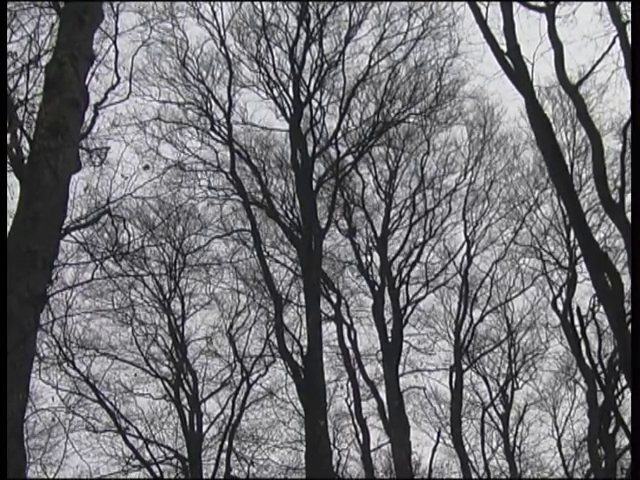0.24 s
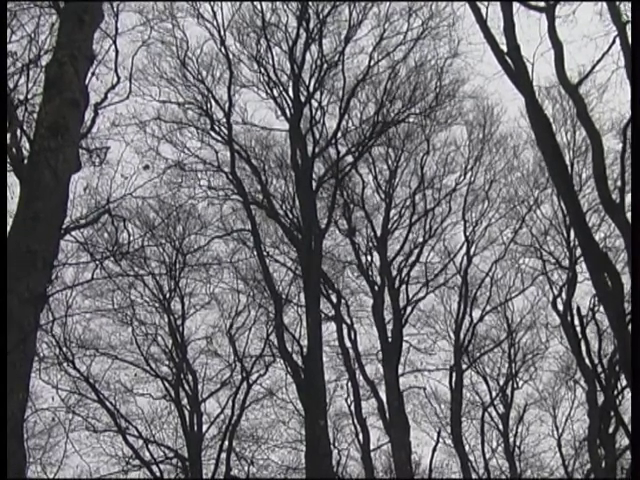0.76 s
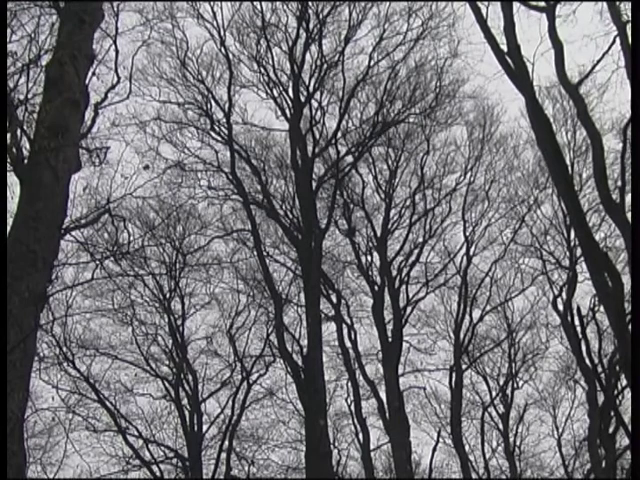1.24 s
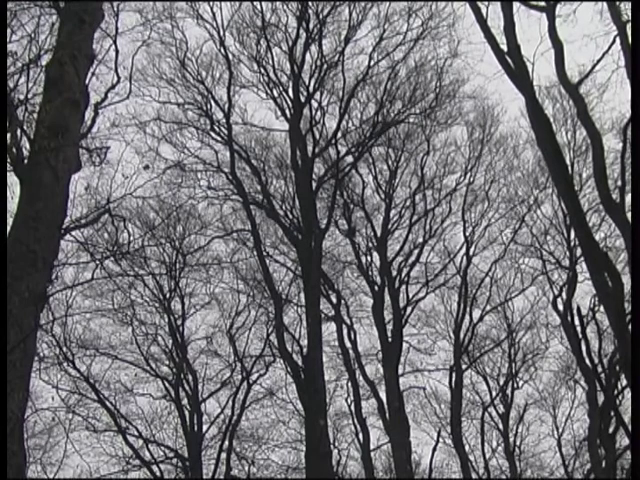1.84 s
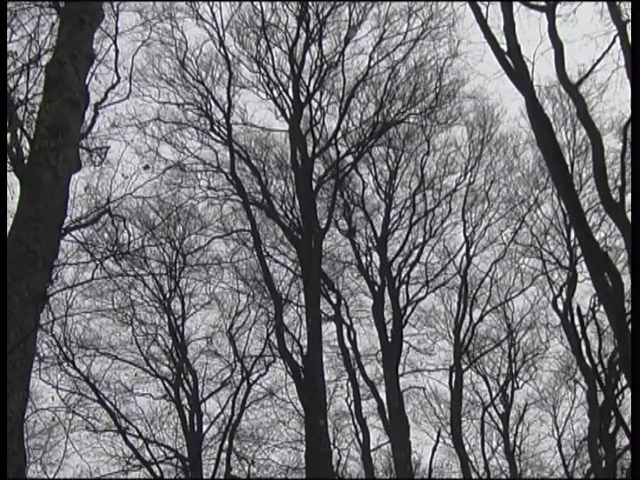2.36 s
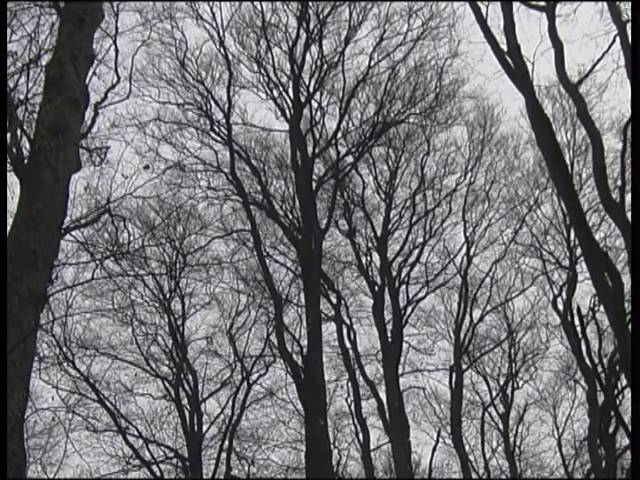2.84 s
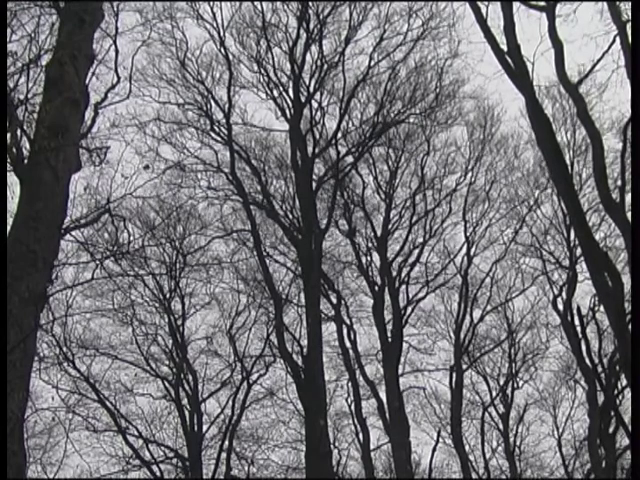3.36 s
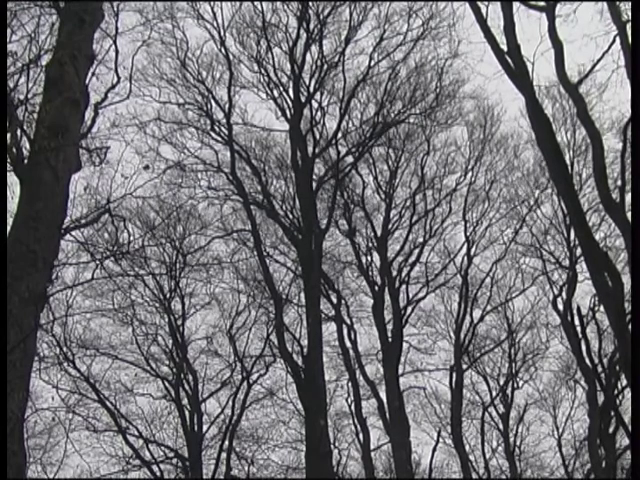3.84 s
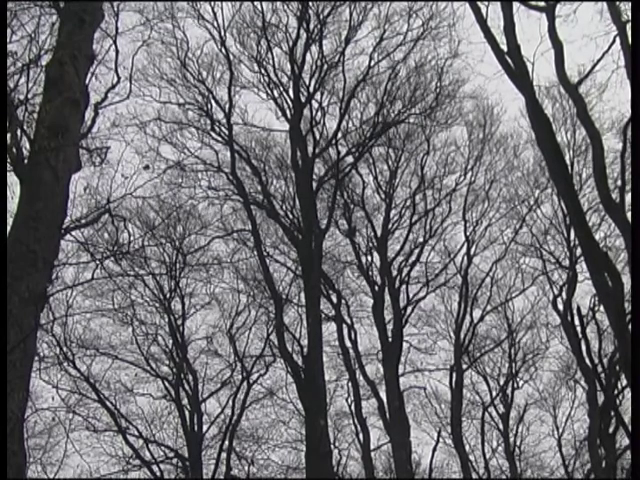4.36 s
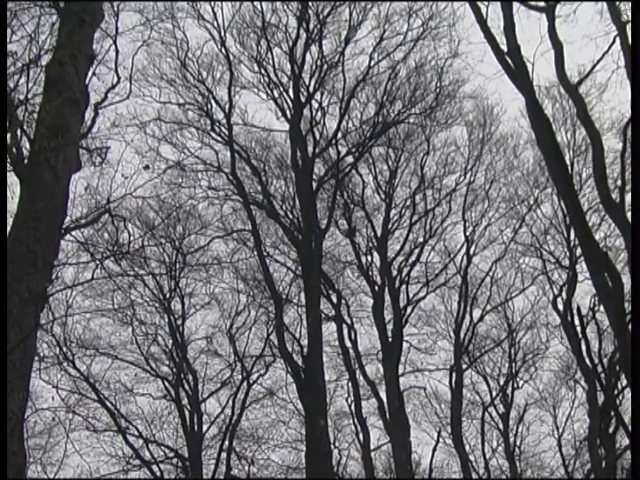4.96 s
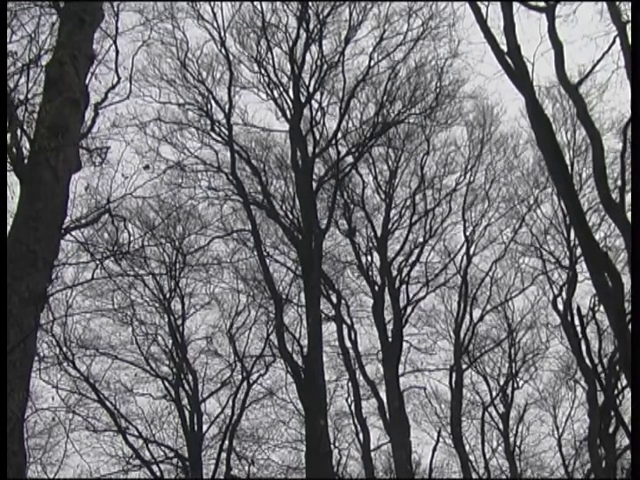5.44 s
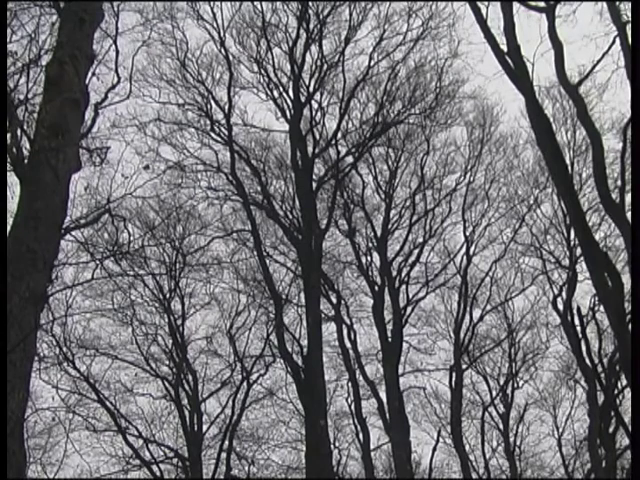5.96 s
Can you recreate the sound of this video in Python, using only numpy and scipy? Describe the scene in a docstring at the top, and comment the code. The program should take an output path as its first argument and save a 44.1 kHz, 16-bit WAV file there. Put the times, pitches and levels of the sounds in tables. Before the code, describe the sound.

In a bare winter wood, a woodpecker drums a dry roll, a chaffinch sings over it, then a louder, hollow roll rings out.

```python
"""The still air of a bare winter wood, a camera's faint hum and thin pulsing high tones, and small birds far off.
A woodpecker drums a dry roll on a dead branch; later a louder roll rings from a hollow trunk.
A chaffinch starts its one full song (trills, a rattle, a flourish) during the first roll and ends before the second.
Struck wood is a set of decaying modes, birds are gliding tones, and air and hiss are shaped noise.
The trunks scatter the drumming, the song and the far calls as echoes and a noisy decaying tail."""
import sys
import numpy as np
from scipy import signal
from scipy.fft import rfft, irfft, next_fast_len
from scipy.io import wavfile
from scipy.ndimage import uniform_filter1d, map_coordinates

SR = 44100
rng = np.random.default_rng(int(sys.argv[2]) if len(sys.argv) > 2 else 0)


def put_to_file(sound):
    """Save the sound as 16-bit audio at rate SR, in the file named by the first command-line argument."""
    columns = np.atleast_2d(sound).T  # one column per channel
    safe = np.clip(columns, -1, 1)
    whole_steps = np.round(safe * 32767)
    wavfile.write(sys.argv[1], SR, whole_steps.astype(np.int16))


N = 273861


def amp(db):
    """Decibels to gain."""
    return 10 ** (np.asarray(db) / 20)


def unit(x):
    """x at rms 1."""
    return x / np.sqrt(np.mean(x ** 2) + 1e-20)


def along(points, hz):
    """Value at hz between (frequency [Hz], value) points on a log axis."""
    f, v = np.transpose(points)
    return np.interp(np.log(hz + 1), np.log(f + 1), v)


def wobble(rate):
    """A smooth random curve with `rate` random knots a second."""
    knots = rng.standard_normal(int(N * rate / SR) + 4)
    return map_coordinates(knots, [np.arange(N) * rate / SR])


def filtered(x, response):
    """x shaped by a gain that depends on frequency."""
    m = next_fast_len(N + SR // 2)
    gain = response(np.fft.rfftfreq(m, 1 / SR))
    return irfft(rfft(x, m) * gain, m)[..., :N]


def noise(spectrum):
    """Coloured noise of rms 1; only the shape of the spectrum counts."""
    white = rng.standard_normal(N)
    return unit(filtered(white, lambda hz: amp(along(spectrum, hz))))


def add(track, s, sound):
    """Mix a sound into the track at time s."""
    part = track[max(round(s * SR), 0):][:len(sound)]
    part += sound[:len(part)]


def forest(x, scatter, echoes, echo_hz, near_t60, far_t60, far_db):
    """Direct sound, echoes of single trunks, quick scatter from near trees and a long tail from far ones."""
    t = np.arange(2 * SR) / SR
    near = amp(-60 * t / near_t60)
    far = amp(far_db - 60 * t / far_t60)
    onset = 1 - np.exp(-t / 0.0011)
    tail = (near + far) * onset * rng.standard_normal(len(t))
    wet = signal.fftconvolve(x, tail / np.linalg.norm(tail))[:N]
    heard = x + filtered(wet, lambda hz: amp(along(scatter, hz)))
    # rough bark mirrors only the longer waves
    dull = filtered(x, lambda hz: 1 / (1 + (hz / echo_hz) ** 2))
    for delay, db in echoes:
        add(heard, delay, amp(db) * dull)
    return heard


def air():
    """The steady hush of the wood, with soft puffs of breeze on the microphone."""
    # spectrum of still air and hiss: (frequency [Hz], relative density [dB])
    hush_spectrum = [(15, -43), (25, -7), (59, -2.5), (107, -7), (154, -3), (195, -4.5), (303, -6),
                     (836, -12), (1270, -19.5), (1520, -17.5), (1730, -21.5), (3590, -18), (5730, -26),
                     (8460, -32.5), (12500, -32), (16200, -68), (22000, -120)]
    # breeze on the microphone: (time [s], level [dB], half length [s])
    breeze = [(0.41, -66, .08), (2.195, -56.5, 0.075), (2.766, -57.5, 0.075), (3.424, -52, 0.063),
              (4.36, -57.5, 0.15)]
    # spectrum of the breeze: (frequency [Hz], relative density [dB])
    breeze_spectrum = [(20, -12), (60, -12), (110, -8), (250, -42), (800, -63)]
    t = np.arange(N) / SR
    puffs = sum(amp(db) * np.exp(-((t - s) / length) ** 2) for s, db, length in breeze)
    hush_level = amp(-57 + wobble(2.85))
    return hush_level * noise(hush_spectrum) + puffs * noise(breeze_spectrum)


def camera():
    """A slightly unsteady hum, thin high tones that pulse 25 times a second, a thin fizz and each channel's hiss."""
    # hum and high tones: (frequency [Hz], rms level before the pulsing [dB], depth of the pulsing [0-1])
    hum_and_high_tones = [(150.1, -64, 0), (13273, -81, .9), (13573, -83, .9), (15622, -75, .3)]
    t = np.arange(N) / SR
    drift = 0.31 * wobble(6.6)  # phase, radians
    pulse = np.cos(2 * np.pi * 25 * t)  # 25 Hz
    tones = np.zeros(N)
    for hz, db, depth in hum_and_high_tones:
        level = np.sqrt(2) * amp(db + .3 * wobble(9.1))
        tones += level * (1 + depth * pulse) * np.sin(2 * np.pi * hz * t + drift)
    fizz = noise([(12000, -30), (13200, -17.5), (15250, -16), (15600, 0), (15750, -7), (15900, -62.5)])
    hiss_spectrum = [(3000, -61), (7000, -4.5), (10000, -1.0), (15000, -7.0)]
    hiss = np.array([noise(hiss_spectrum) for channel in range(2)])
    return tones + amp(-76) * fizz + amp(-77.0) * hiss


def syllables():
    """The bird syllables by name, each a (shape, depth of the raspy flutter [0-1]) pair."""
    # chaffinch shapes: (time from the start [s], frequency [Hz], relative level [dB])
    slur = [(0, 5744, -13), (.008, 4904, -7.5), (.019, 3980, -2.5), (.027, 2715, -16), (.030, 3700, -2),
            (.037, 4785, -8)]
    dip = [(0, 3680, -11), (.005, 4547, -13), (.009, 3690, -6.5), (.012, 4200, -7), (.016, 3234, -0.5),
           (.026, 2675, -4), (.032, 2150, -13.5), (.037, 3000, -5), (.047, 3282, -3), (.053, 3190, -9)]
    stroke = [(0, 4120, -10.5), (.004, 3723, -5.5), (.008, 3200, -2), (.012, 2740, -25)]
    zip_note = [(0, 3530, -5.5), (.009, 7130, -10), (.014, 4955, -3.5), (.020, 6774, -11.5),
                (.026, 4870, 2.5), (.029, 6140, -2.5), (.036, 3890, -4), (.043, 5220, 0)]
    rasp_note = [(0, 5400, -11), (.005, 3930, -3.5), (.007, 5050, -1), (.012, 2800, 5), (.014, 3930, -2.5),
                 (.020, 2200, -1), (.022, 2850, -4.5), (.030, 1845, -6.5)]
    tick = [(0, 7480, 4.5), (.004, 4980, -3.5), (.010, 3600, -12.5), (.016, 4360, 8)]
    whistle = [(0, 1890, -13), (.025, 2007, -14), (.040, 2478, -4.5), (.053, 3110, 0), (.062, 2500, -9.5),
               (.073, 1340, -19)]
    # far birds' shapes: (time from the start [s], frequency [Hz], relative level [dB])
    high_note = [(0, 5950, -14), (.03, 6010, -3.5), (.07, 6100, -4)]
    low_note = [(0, 4350, -2.5), (.035, 4330, -0.5), (.062, 4340, -4)]
    sigh = [(0, 3750, -9.5), (.03, 3316, 2.5), (.05, 2870, -9)]
    far_cry = [(0, 1148, -4), (.05, 1312, -1.5), (.11, 1300, -4), (.16, 1092, -3)]
    pip = [(0, 3200, -9), (.006, 3080, 2.5), (.014, 2950, -12.5)]
    buzz = [(0, 3360, -3.5), (.02, 3350, 1), (.04, 3300, -6)]
    flute = [(0, 2250, -5), (.1, 2250, -3.5), (.17, 2230, -4.5)]
    return {"slur": (slur, 0.01), "dip": (dip, .011), "stroke": (stroke, .0062),
            "zip": (zip_note, 0.0695), "rasp": (rasp_note, 0.037), "tick": (tick, .05),
            "whistle": (whistle, 0.0072), "high": (high_note, .002), "low": (low_note, .0019),
            "sigh": (sigh, .02), "cry": (far_cry, .062), "pip": (pip, .01),
            "buzz": (buzz, .055), "flute": (flute, 0.0044)}


def sing(notes):
    """A tone glides through each syllable's shape; a fast flutter of its pitch makes it raspy."""
    track, flutter = np.zeros(N), wobble(700)
    shapes = syllables()
    for s, syllable, level, ratio in notes:
        shape, rasp = shapes[syllable]
        knots, hz, db = np.transpose(shape)
        t = np.arange(int(knots[-1] * SR)) / SR
        swell = amp(np.interp(t, knots, db)) * signal.windows.tukey(len(t), .12)
        glide = uniform_filter1d(np.interp(t, knots, hz), size=60)
        local_flutter = flutter.take(round(s * SR) + np.arange(len(t)), mode="clip")
        pitch = ratio * glide * (1 + rasp * local_flutter)
        phase = 2 * np.pi * np.cumsum(pitch) / SR
        add(track, s, amp(level) * swell * np.sin(phase))
    return track


def beats(pace):
    """Times of a repeated syllable whose gap changes steadily."""
    gaps = pace["gap"] + pace["slowing"] * np.arange(pace["count"] - 1)
    return pace["start"] + np.append(0, np.cumsum(gaps))


def trill(syllable, pace, course):
    """One syllable repeated while its level and pitch follow the course."""
    s, db, ratio = np.transpose(course)
    return [(at, syllable, np.interp(at, s, db), np.interp(at, s, ratio)) for at in beats(pace)]


def twitter(s, db, count):
    """A short buzz, then pips that step down in pitch."""
    wait_s, gap_s, fall = .068, 0.013, 0.93  # buzz to first pip, pip to pip, pitch ratio per pip
    pips = [(s + wait_s + k * gap_s, "pip", db, fall ** k) for k in range(count)]
    return [(s, "buzz", db, 1)] + pips


def chirps(count):
    """Faint falling chirps at random moments and pitches."""
    relative_db, centre_ratio, spread_octaves = -60.5, 1.15, .2
    return [(when * N / SR, "sigh", relative_db, centre_ratio * 2 ** (spread_octaves * (2 * pitch - 1)))
            for when, pitch in rng.random((count, 2))]


def far_birds():
    """Thin gliding tones from deep in the wood, over a blurred chorus of noise bands that comes and goes."""
    # the clearest calls: (time [s], syllable, relative level [dB], pitch ratio)
    clear_calls = [(.22, "flute", -64, 1.5), (.61, "buzz", -58, 1.3), (.735, "pip", -53, 1.34),
                   (1.93, "high", -65, 1.04), (2.22, "cry", -59.5, 1.03), (3.47, "cry", -58.5, 0.98),
                   (3.838, "sigh", -54, 1.02), (4.0, "flute", -64.5, 1), (4.2, "flute", -64, 1),
                   (4.55, "zip", -50.5, .87), (4.575, "buzz", -50.5, 1.4), (5.37, "buzz", -63, 1.9),
                   (5.99, "buzz", -58, .85), (6.06, "cry", -61, 1.2), (6.08, "flute", -61, 1.2)]
    # a buzz and falling pips: (time [s], relative level [dB])
    twitters = [(.09, -60), (.592, -57), (4.062, -56.5)]
    # a thin run of pips: start [s], count, first gap [s], lengthening of each next gap [s]
    tinkle_pace = dict(start=.34, count=7, gap=.025, slowing=.0008)
    # its pitch sinks and levels out: (time [s], relative level [dB], pitch ratio)
    tinkle = [(.34, -64, 1.52), (0.421, -57, 1.3), (.5, -56, 1.24)]
    # turns of a high and a low note: start [s], count, first gap [s], lengthening of each next gap [s]
    seesaw_pace = dict(start=3.9, count=3, gap=.33, slowing=0)
    # one turn: (time into it [s], syllable, relative level [dB], pitch ratio)
    seesaw = [(0, "high", -62.5, 1.005), (0.231, "low", -58.5, 1)]
    notes = clear_calls + trill("pip", tinkle_pace, tinkle) + chirps(count=5)
    notes += [(turn + s, *note) for turn in beats(seesaw_pace) for s, *note in seesaw]
    notes += [note for s, db in twitters for note in twitter(s, db, count=4)]
    calls = forest(amp(-1.0) * sing(notes), [(2000, -2), (6000, -0.97)], [],
                   echo_hz=8000, near_t60=.5, far_t60=1.9, far_db=0)
    voices = [noise([(hz / 2, -60), (hz, 0), (hz * 2, -80)]) for hz in (2700, 3400, 4300)]
    chorus = sum(amp(5.0 * wobble(5)) * voice for voice in voices)
    return calls + amp(-70.0) * unit(chorus)


def roll(pace, force):
    """The blows of one roll as (s, click dB, ring dB); the gap between them shrinks along an S-curve."""
    blow = np.arange(pace["count"] - 1)
    slowness = 1 / (1 + (blow / pace["halfway"]) ** pace["abrupt"])
    gaps = pace["fast"] + (pace["slow"] - pace["fast"]) * slowness
    times = pace["start"] + np.append(0, np.cumsum(gaps))
    s, click_db, ring_db = np.transpose(force)
    return zip(times, np.interp(times, s, click_db), np.interp(times, s, ring_db))


def drumming(blows, modes, contact_hz, level_db, main_db):
    """Each blow of the bill sets the wood's modes ringing; the contact time dulls the click."""
    track, t = np.zeros(N), np.arange(SR // 6) / SR
    for s, click_db, ring_db in blows:
        rings = []
        for hz, level, t60, rise in modes:
            decay = amp(level + rng.normal(0, 0.85) - 60 * t / t60)
            swell = 1 - np.exp(-t / rise)  # modes with a long rise swell after the click
            rings.append(decay * swell * np.cos(2 * np.pi * hz * t))
        main = amp(ring_db + main_db) * rings[0]
        click = amp(click_db) * sum(rings[1:])
        add(track, s, amp(level_db) * (main + click))
    soft = signal.sosfilt(signal.butter(7, contact_hz, fs=SR, output="sos"), track)
    # the wood radiates little bass
    return signal.sosfilt(signal.butter(2, 270, "high", fs=SR, output="sos"), soft)


def branch_roll():
    """Dry knocks: short modes of a dead branch under blows that speed up, swell from a weak first tap, then fade."""
    # start [s], count, slow first gap [s], fast final gap approached [s], halfway [blows], abruptness
    branch_pace = dict(start=.7992, count=12, slow=.0636, fast=.04, halfway=5.42, abrupt=3.06)
    # force of the blows: (time [s], relative click level [dB], relative level of the main ring [dB])
    branch_force = [(.8, -41, -42.5), (.865, -24, -37), (.99, -25.5, -34), (1.16, -22.5, -35),
                    (1.21, -34.5, -35), (1.3, -27.5, -40), (1.39, -29, -42)]
    # modes, the main one first: (frequency [Hz], relative level [dB], t60 [s], rise [s])
    branch_modes = [(520, 3.8, .022, 0.0032), (1700, -3, 0.0091, 0.001), (2000, -0.5, 0.0063, 0.00021),
                    (2400, -0.5, 0.0061, 0.00021)]
    # scatter from the trees against the direct sound: (frequency [Hz], level [dB])
    branch_scatter = [(200, -21), (300, 9.5), (380, -12), (520, -8), (800, 10), (1100, 5), (1600, 1),
                      (2000, -3), (2500, -22), (4000, 20)]
    # nearby trunks: (delay [s], echo level before dulling [dB])
    branch_echoes = [(.008, -28), (0.019, -14.5)]
    blows = roll(branch_pace, branch_force)
    branch = drumming(blows, branch_modes, contact_hz=3200, level_db=2.5, main_db=10)
    return forest(branch, branch_scatter, branch_echoes, echo_hz=3500, near_t60=0.25, far_t60=1.17, far_db=-3.0)


def chaffinch():
    """The near singer: gliding syllables smeared by the trees; twigs and air take off the highest notes."""
    # trills: start [s], count, first gap [s], lengthening of each next gap [s]
    opening_pace = dict(start=.964, count=8, gap=.0881, slowing=-.0015)
    middle_pace = dict(start=1.6238, count=9, gap=.084, slowing=.00072)
    rattle_pace = dict(start=2.7665, count=12, gap=.0136, slowing=.00038)
    # course of each trill: (time [s], relative level [dB], pitch ratio)
    opening = [(.965, -42, 1.02), (1.35, -28.5, 0.98), (1.55, -28.5, 1.05)]
    middle = [(1.624, -30, 1.203), (1.719, -29, 1.063), (1.9, -28.5, 1.01), (2.316, -30, 0.98)]
    rattle = [(2.767, -31, 1), (2.791, -28, 1.07), (2.826, -26, .98), (2.86, -27, .81), (2.92, -36, .62),
              (2.94, -49, 0.5)]
    # single syllables before and after the rattle: (time [s], syllable, relative level [dB], pitch ratio)
    flourish = [(2.409, "zip", -38, 0.89), (2.499, "zip", -34, 1.055), (2.581, "zip", -36, 1),
                (2.660, "rasp", -34.5, 1), (3.031, "tick", -41, 1.02), (3.065, "whistle", -31, 1),
                (3.200, "tick", -41, 1), (3.235, "whistle", -30.5, 1.04), (3.377, "zip", -36.5, .99),
                (3.458, "zip", -35.5, 1.026), (3.543, "zip", -43, 1.01), (3.637, "rasp", -39.5, 0.92)]
    # scatter from the trees against the direct sound: (frequency [Hz], level [dB])
    song_scatter = [(2000, 0), (4000, 0), (6000, 3.5)]
    # nearby trunks: (delay [s], echo level before dulling [dB])
    song_echoes = [(0.012, -28), (.034, -16.5)]
    trills = trill("slur", opening_pace, opening) + trill("dip", middle_pace, middle)
    trills += trill("stroke", rattle_pace, rattle)
    # a voice 11 dB weaker and 1.2 times higher sounds along in the harsh syllables
    second_voice = [(s, syllable, db - 11, ratio * 1.2)
                    for s, syllable, db, ratio in flourish if syllable in ("zip", "tick")]
    voice = amp(-2.5) * sing(trills + flourish + second_voice)
    treble_loss = [(4500, 0), (6500, -4.5), (8000, -10.5), (10000, -31)]  # (frequency [Hz], gain [dB])
    song = filtered(voice, lambda hz: amp(along(treble_loss, hz)))
    return forest(song, song_scatter, song_echoes, echo_hz=8000, near_t60=0.25, far_t60=1.0, far_db=-5.0)


def trunk_roll():
    """The louder, ringing roll: longer-lived modes of a hollow trunk under blows that speed up and weaken."""
    # start [s], count, slow first gap [s], fast final gap approached [s], halfway [blows], abruptness
    trunk_pace = dict(start=4.7738, count=14, slow=.0519, fast=.0367, halfway=4.14, abrupt=2.4)
    # force of the blows: (time [s], relative click level [dB], relative level of the main ring [dB])
    trunk_force = [(4.774, -23, -21), (4.971, -21.5, -21.5), (5.18, -29.5, -27), (5.22, -39, -32),
                   (5.26, -34, -33.5), (5.335, -37.5, -33.5)]
    # modes, the main one first: (frequency [Hz], relative level [dB], t60 [s], rise [s])
    trunk_modes = [(908, -5.3, 0.046, 0.00051), (645, -19, .065, 0.0031), (745, -10, 0.017, 0.0035),
                   (999, -13.5, 0.046, .001), (1416, -1, 0.017, 0.00087), (1704, 7.2, 0.009, 0.0011),
                   (2430, -6, 0.0082, 0.00095), (3380, -16.5, 0.0079, 0.00026)]
    # scatter from the trees against the direct sound: (frequency [Hz], level [dB])
    trunk_scatter = [(250, 3), (340, 9), (480, 6), (650, 7.5), (900, 11), (1400, -3.5), (2000, -8),
                     (4000, 3.5)]
    # nearby trunks: (delay [s], echo level before dulling [dB])
    trunk_echoes = [(0.014, -18.5), (.031, -9)]
    blows = roll(trunk_pace, trunk_force)
    trunk = drumming(blows, trunk_modes, contact_hz=3700, level_db=1.5, main_db=0.5)
    return forest(trunk, trunk_scatter, trunk_echoes, echo_hz=1200, near_t60=0.75, far_t60=2.28, far_db=-14.5)


def scene():
    """Everything in the wood arrives alike at both channels; only the camera's hiss differs."""
    return air() + camera() + far_birds() + branch_roll() + chaffinch() + trunk_roll()


def record(dry):
    """The camera keeps nothing above its band limit of 15850 Hz."""
    return filtered(dry, lambda hz: hz < 15850)


dry = scene()
out = record(dry)
put_to_file(out)
```